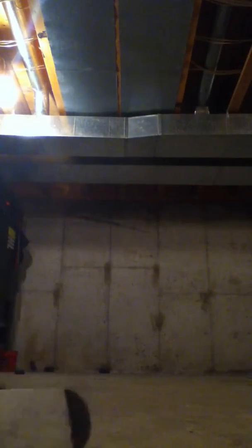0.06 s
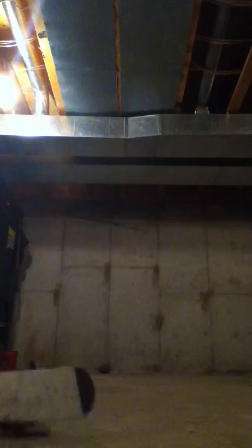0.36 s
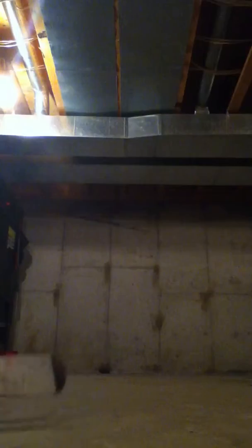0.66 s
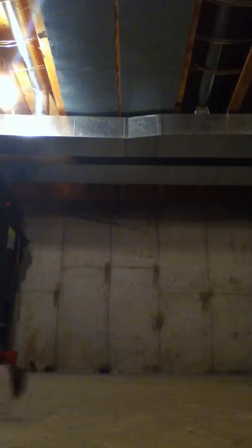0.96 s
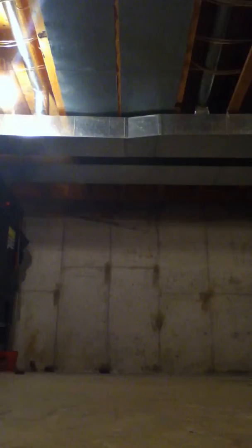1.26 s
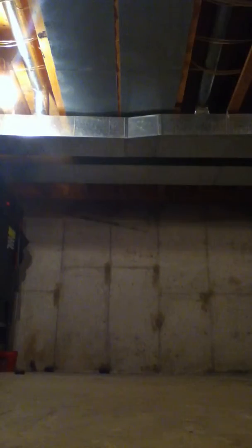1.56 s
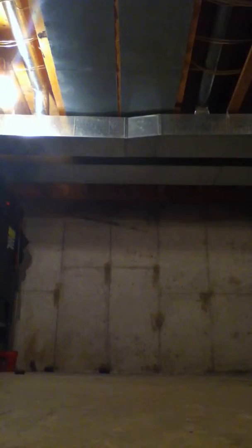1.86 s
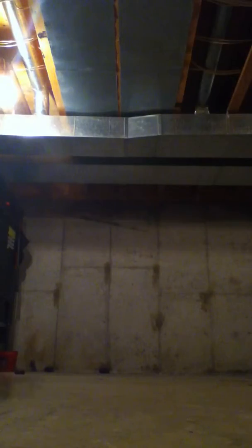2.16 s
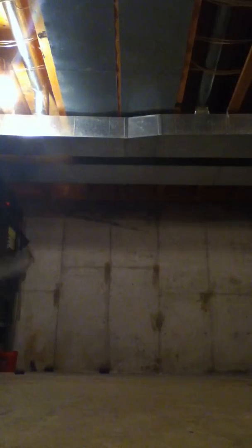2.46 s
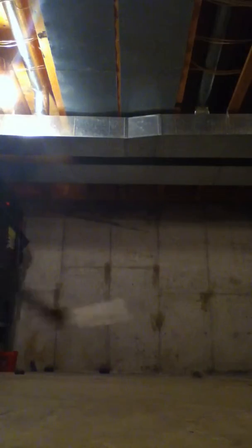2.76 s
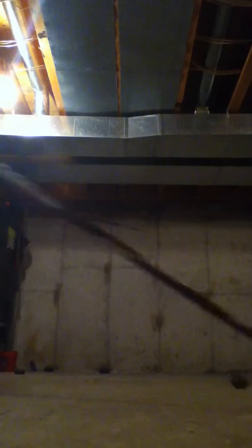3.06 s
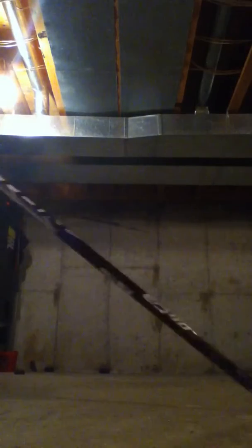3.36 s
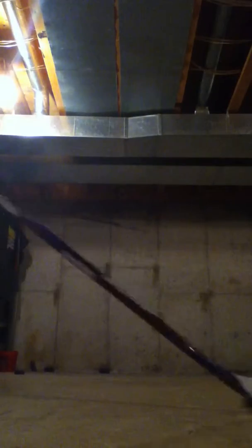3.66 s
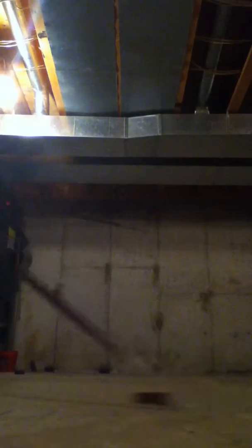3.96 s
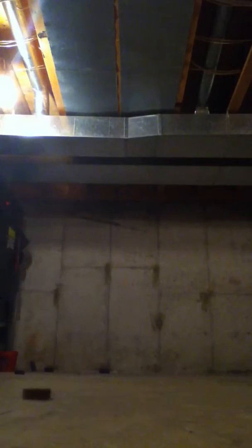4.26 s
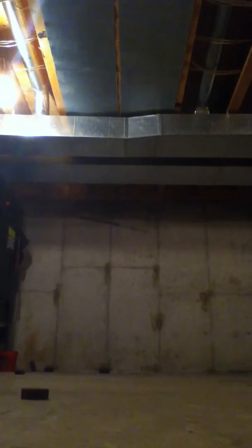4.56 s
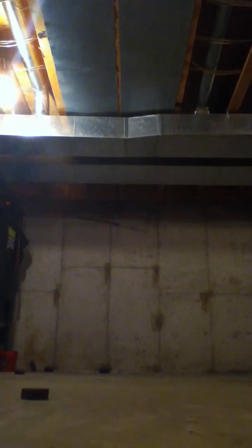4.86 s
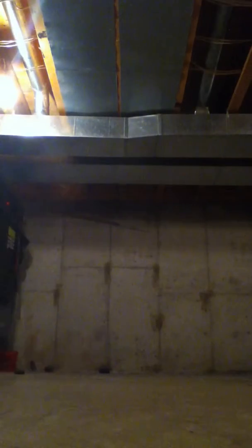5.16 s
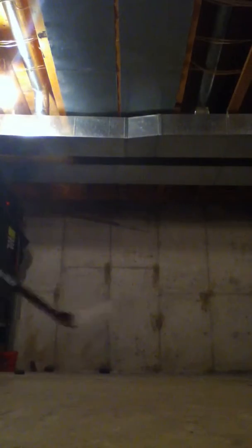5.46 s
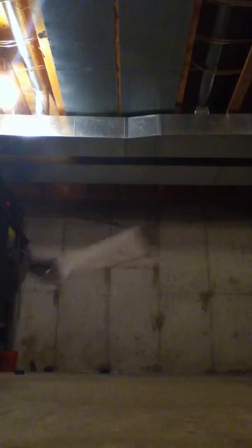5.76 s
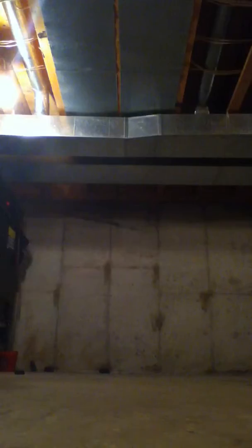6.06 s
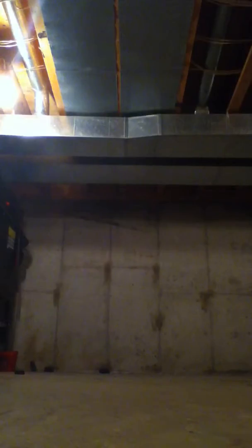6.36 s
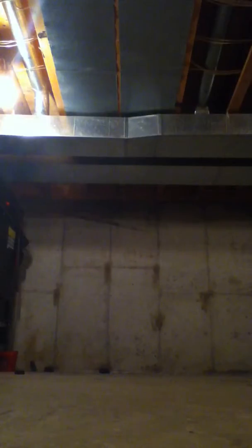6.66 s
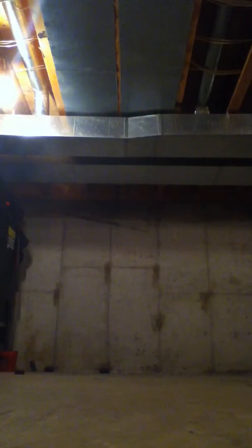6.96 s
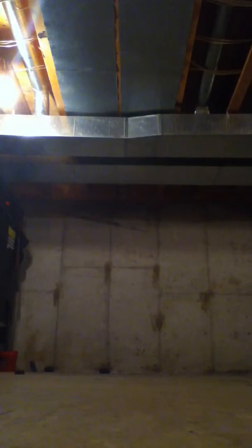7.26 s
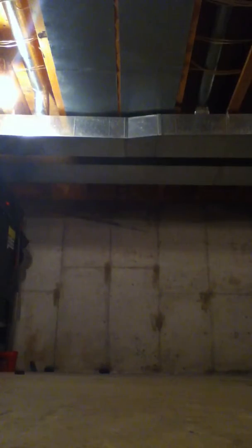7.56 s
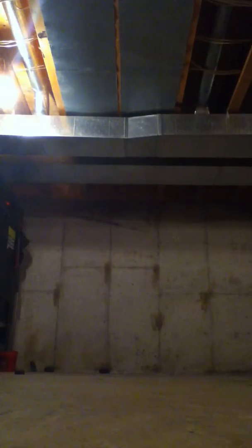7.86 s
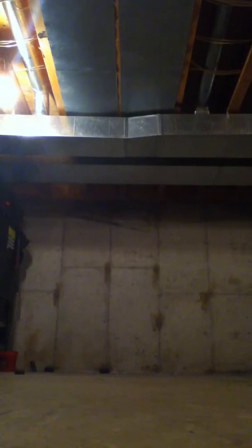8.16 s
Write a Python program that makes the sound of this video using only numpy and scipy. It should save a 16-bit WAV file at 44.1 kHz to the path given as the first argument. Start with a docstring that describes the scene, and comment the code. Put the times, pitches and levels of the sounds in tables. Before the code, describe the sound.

Two sharp cracks of a hockey puck hitting a basement wall, amid woody taps, dull footsteps and a stick slapping concrete.

```python
"""A hockey puck is tapped about a concrete basement and shot twice at the wall, where it drops and bounces.
The stick's blade clacks, chatters and scrapes on the floor, feet thud and clothes swish.
Each blow is a short burst of force that rings the struck body, then the bare room. A small microphone
on the floor is buffeted by the swings and overloads on the hardest hits. A faint whine comes and
goes over quiet rumble, hiss and hum."""
import sys
import numpy as np
from scipy import signal
from scipy.fft import rfft, irfft
from scipy.io import wavfile

SR = 44100
rng = np.random.default_rng(int(sys.argv[2]) if len(sys.argv) > 2 else 0)


def wav_record(signal):
    """Record a signal, one row per channel, as 16-bit PCM in the file named by sys.argv[1]."""
    frames = np.transpose(np.atleast_2d(signal))
    bounded = np.clip(frames, -1, 1)
    # unit amplitude maps onto the largest positive 16-bit level
    quanta = np.round(bounded * 32767).astype(np.int16)
    wavfile.write(sys.argv[1], SR, quanta)


N = 362497
RING = 32768  # samples for a blow to ring out
TIME, AGE = np.arange(N) / SR, np.arange(RING) / SR  # seconds into the scene, seconds into a blow


# Puck meets blade. Each row: start in seconds, then level, bass, treble and room send in dB.
TAP_HITS = [(.0966, -20, -5, 2.5, -7), (.9362, -12, 4.5, -9.5, -7.5), (3.364, -33, 27, 5, 1.5),
            (3.4185, -17.5, 14, -12.5, -2.5), (3.422, -20.5, -8, -18, -8), (4.278, -38, 10, 8, 4),
            (5.799, -30, 20, -34, -7.5), (7.8838, -16.5, 2.5, 6, 9.5), (7.891, -15, -20, 2.5, -1.5),
            (7.8945, -22, 9.5, -6, 3.5)]
# The woody tone of the blade. Each row: frequency in Hz, gain in dB.
WOOD_EQ = [(40, -34), (100, -26), (200, -19), (550, -12.5), (900, -4), (1250, -0.5), (2200, -2.5),
           (3500, -6), (5500, -12), (8000, -25.5), (11000, -48), (16000, -61.5)]
# Its resonances. Each row: frequency in Hz, width in Hz, boost in dB.
WOOD_PEAKS = [(674, 59, 7.5), (1060, 70, 5), (1242, 54, 7), (1374, 133, 7), (2055, 102, 9.5), (2330, 70, 8),
              (2790, 25, 4.5), (2950, 28, 7.5), (3590, 66, 7.5)]

def puck_taps():
    """Puck and blade knock together with a clean, woody tock."""
    return blows(TAP_HITS, WOOD_EQ, WOOD_PEAKS, chatter=0.35, chatter_s=0.0015, touch_db=-14)


# Two shots, each a cluster of hits. Each row: start in seconds, then level, bass, treble, room send in dB.
SHOT_HITS = [(2.264, -8.5, 7.5, -6, -15.5), (2.266, -3.5, -6.5, 4.5, -17), (2.276, -16, -6.5, -1, 9),
             (2.29, -27.5, -3.5, -6.5, 15), (2.3045, -12, 7, -0.5, 5), (2.331, -22.5, -5, -15, 10.5),
             (5.1915, -9.5, 25, -11, -6.5), (5.194, -11.5, -23, -2, 4), (5.2015, -5.5, 4.5, -6, -1.5),
             (5.207, -23.5, 1, -4, 11)]
# The hard tone of the slam. Each row: frequency in Hz, gain in dB.
WALL_EQ = [(40, -28.5), (280, -18.5), (450, -4.5), (700, -5), (1800, 2), (3000, -2), (5200, -1),
           (8000, -10.5), (11000, -16.5), (16000, -57.5)]
# Its resonances. Each row: frequency in Hz, width in Hz, boost in dB.
WALL_PEAKS = [(580, 110, 4.4), (728, 120, 5.5), (857, 30, 3.3), (1020, 150, 2.8), (1400, 56, 1.7),
              (1880, 59, 2)]

def wall_shots():
    """The blade whips the puck away and it slams into the wall with a tight crack."""
    return blows(SHOT_HITS, WALL_EQ, WALL_PEAKS, chatter=1.4, chatter_s=0.00053, touch_db=-31)


# Puck meets floor. Each row: start in seconds, then level, bass, treble and room send in dB.
BOUNCE_HITS = [(.0252, -21, 0.5, 5, -14), (.072, -27.5, 4, -4, -5.5), (.3255, -28, 4, -5.5, -22),
               (.395, -37, 29, -18, -5), (.495, -37.5, 14.5, 19, -2.5), (.5965, -30.5, 5, 13.5, -0.5),
               (.5984, -27.5, 7, 25, -25), (.671, -29.5, 7, 13.5, -5), (.697, -36.5, -2.5, -2, -1.5),
               (1.146, -40.5, 7, 6, -3), (1.184, -49, 8, 6, -1), (2.5342, -18, -1.5, 22, -3),
               (2.5388, -17.5, -9, -23, -2), (2.574, -24, -10, -14, -4), (2.7005, -32.5, 3.5, 14, 3),
               (2.957, -32.5, 0.5, -6, -6.5), (3.248, -37.5, 4.5, 4, 3.5), (3.265, -36, 3, 7, -8),
               (4.292, -37.5, 11, 15, 1), (4.837, -42, 13.5, 5, -1), (5.449, -19.5, -6.5, -19, 2.5),
               (5.4535, -30, 9, 24, 4), (5.644, -36, 3, -18, 14.5), (8.0095, -25.5, -1, 0.5, 4)]
# The dark tone of the puck. Each row: frequency in Hz, gain in dB.
PUCK_EQ = [(40, -16), (200, -4.5), (450, 0), (850, -3), (1400, -6.5), (2200, -10), (3500, -18.5),
           (6500, -26.5), (10000, -34), (16000, -59.5)]
# Its weak resonances. Each row: frequency in Hz, width in Hz, boost in dB.
PUCK_PEAKS = [(570, 180, 2.5), (900, 34, 1.5), (1110, 36, 1)]

def puck_bounces():
    """The puck drops and bounces on the concrete, barely ringing."""
    return blows(BOUNCE_HITS, PUCK_EQ, PUCK_PEAKS, chatter=0.78, chatter_s=0.0022, touch_db=-16)


# Blade meets floor. Each row: start in seconds, then level, bass, treble and room send in dB.
CLACK_HITS = [(.001, -31, 0, 6.5, 9.5), (1.353, -58, 2, 40, -3), (4.714, -55, 1.5, 16, -14),
              (4.745, -61, 0, 18, -6), (4.85, -48, -3, 1, 0), (6.514, -25.5, 1, -15, 9),
              (6.5312, -16, 18, 29, 2.5), (6.54, -18.5, 5, 1, 9), (6.5842, -8.5, -2, 0, -2.5),
              (6.5905, -13.5, -5.5, -4, -2), (7.084, -46, 3, 27, -7), (7.101, -50.5, -1.5, 10.5, 4.5),
              (7.3008, -13, 5, 6, -1), (7.308, -19, 10, 32, 2.5), (7.5808, -27.5, 13.5, 20, 1),
              (7.8808, -33, 4, -2, -11), (7.8838, -17, 9.5, 8, -3)]
# The mid-forward tone of the slap. Each row: frequency in Hz, gain in dB.
BLADE_EQ = [(40, -26), (110, -13.5), (250, 1), (700, 4.5), (1600, 5.5), (3000, 3.5), (5000, -6),
            (8000, -15), (11000, -22.5), (16000, -58)]
# Its narrow resonances. Each row: frequency in Hz, width in Hz, boost in dB.
BLADE_PEAKS = [(700, 22, 6.8), (992, 30, 4.6), (1134, 38, 3.8), (1275, 31, 6.4), (1525, 22, 3.3),
               (1706, 30, 10.1), (2079, 26, 8.5), (2387, 35, 5.3), (3000, 25, 3.8), (3289, 30, 5),
               (3700, 72, 7.3), (4350, 30, 6), (4950, 60, 6)]

def blade_clacks():
    """The blade slaps the concrete: a rough attack and a ringing clack."""
    return blows(CLACK_HITS, BLADE_EQ, BLADE_PEAKS, chatter=4.6, chatter_s=0.0019, touch_db=-10.5)


# A quick run of edge hits. Each row: start in seconds, then level, bass, treble and room send in dB.
EDGE_HITS = [(7.5245, -22.5, -4, -8, -4), (7.5355, -25, 1, -5, -6), (7.5808, -19, 0, 10, -2.5),
             (7.5875, -23.5, -3, 0, -9), (7.591, -20.5, -4, -2, -13.5), (7.5978, -24, -1, 2, -12.5)]
# The thin tone of the edge. Each row: frequency in Hz, gain in dB.
EDGE_EQ = [(40, -35), (500, -19), (1800, -7), (3200, -0.5), (4400, -6), (7500, -11), (11000, -26.5),
           (16000, -54)]
# Its bright resonances. Each row: frequency in Hz, width in Hz, boost in dB.
EDGE_PEAKS = [(3030, 68, 7), (3390, 90, 7), (4870, 60, 13), (6340, 120, 4)]

def edge_chatter():
    """The blade's hard edge skips over the floor in bright ticks."""
    return blows(EDGE_HITS, EDGE_EQ, EDGE_PEAKS, chatter=0.7, chatter_s=0.001, touch_db=-11)


# Drags and skids. Each row: start and length in seconds, then level, bass and treble in dB.
DRAGS = [(0.278, 0.035, -48.5, 10, -1), (0.295, 0.024, -40, 10, -48), (3.559, 0.16, -48, 4, -1),
         (3.748, 0.03, -34, 4, -4.5), (3.778, 0.16, -34.5, 1.5, 0), (3.8, 0.1, -35, -5, -4),
         (7.514, 0.03, -21.5, -11.5, -1)]
# The gritty tone of the floor. Each row: frequency in Hz, gain in dB.
GRIT_EQ = [(40, -31), (300, -4), (900, -4), (1900, -2), (3200, -1), (5000, -6.5), (8000, -9.5),
           (11000, -20.5), (16000, -44)]
# Resonances of the dragged blade. Each row: frequency in Hz, width in Hz, boost in dB.
DRAG_PEAKS = [(717, 20, -0.5), (1145, 50, 6.5), (1800, 71, 8), (2105, 50, 6), (2480, 55, 6.5),
              (3020, 36, 6.5), (3600, 90, 1), (4950, 83, 6)]

def blade_scrapes(grain_db=6.5, catch_db=5, catch_hz=110, room_db=-2):
    """Grit catches and releases the blade: dense, uneven clicks in short spurts."""
    out = np.zeros(N)
    for start, length, db, bass_db, treble_db in DRAGS:
        size = int(length * SR)
        grip = np.interp(AGE * catch_hz, np.arange(RING), rng.standard_normal(RING))
        clicks = rng.standard_normal(RING) * undb(grain_db * rng.standard_normal(RING) + catch_db * grip)
        force = unit(clicks[:size]) * signal.windows.tukey(size, alpha=0.3)
        ring = body(GRIT_EQ, DRAG_PEAKS, bass_db, treble_db)
        add(out, start, undb(db) * signal.fftconvolve(force, ring))
    return out + undb(room_db) * signal.fftconvolve(out, basement())[:N]


# Footfalls and puck thumps. Each row: start in seconds, then level, bass, treble and room send in dB.
THUD_HITS = [(.966, -31.5, -19, -23, -10), (2.808, -41.5, -15.5, -7, 5.5), (2.88, -36, -13, 2, 1),
             (3.057, -38.5, -10, 6, 8), (3.154, -49, -9, 10, 14), (3.708, -39.5, -20, 2, 7),
             (4.135, -46.5, -2, 3, 6), (4.19, -56, -4, 0, 12), (5.642, -21.5, 3.5, 19.5, -9),
             (6.061, -27.5, -1, -3.5, -1.5), (6.2755, -26.5, -10, -5, 0), (6.466, -29.5, -4, 0.5, 1.5)]
# Their muffled tone. Each row: frequency in Hz, gain in dB.
THUD_EQ = [(40, -24), (100, -17.5), (190, 1.5), (380, -0.5), (700, -7), (1300, -24), (4000, -29),
           (16000, -50)]
# Their low resonances. Each row: frequency in Hz, width in Hz, boost in dB.
THUD_PEAKS = [(188, 81, 9.5), (357, 49, 7)]

def thuds():
    """Feet and puck land dully, the force smeared over a long contact."""
    return blows(THUD_HITS, THUD_EQ, THUD_PEAKS, chatter=2.1, chatter_s=0.015, touch_db=-19)


# The stick passes the microphone. Each row: fastest moment in seconds, level in dB.
STICK_PASSES = [(2.285, -28), (5.194, -36)]
# Pops of air. Each row: start in seconds, signed strength, decay in seconds.
AIR_POPS = [(2.2659, -0.74, 0.0011), (2.2833, 0.6, 0.0023)]

def swing_wind(rise_db_per_s=193, fall_db_per_s=396, pop_rise_s=0.0001):
    """The swings buffet the microphone: a low flutter and two abrupt shoves of air."""
    wind_eq = [(10, -12.5), (30, -5), (80, -17.5), (200, -14.5), (1000, -55), (5000, -100)]
    flutter = colour(rng.standard_normal(N), wind_eq)
    out = np.zeros(N)
    for peak_s, db in STICK_PASSES:
        fade_db = np.maximum(rise_db_per_s * (peak_s - TIME), fall_db_per_s * (TIME - peak_s))
        out += undb(db - fade_db) * flutter
    for start, strength, decay in AIR_POPS:
        add(out, start, strength * (1 - np.exp(-AGE / pop_rise_s)) * np.exp(-AGE / decay))
    return out


# Strides and arm strokes. Each row: start in seconds, length in seconds, relative level in dB.
STROKES = [(0.7, 0.35, -48), (1.533, 0.26, -59.5), (1.947, 0.16, -63), (2.113, 0.12, -40.5),
           (2.791, 0.089, -44.5), (3.0, 0.45, -57.5), (3.413, 0.23, -59.5), (3.93, 0.12, -52),
           (4.074, 0.23, -49.5), (4.434, .22, -50), (4.837, 0.14, -54.5), (5.001, .11, -42.5),
           (5.086, 0.25, -47), (5.656, 0.059, -49), (5.725, 0.11, -51), (5.854, 0.16, -41.5),
           (5.99, 0.28, -48.5), (6.368, 0.2, -54), (7.11, 0.16, -60), (8.04, .13, -45),
           (8.133, 0.14, -42.5)]

def clothes_swishes(gain_db=2, grain_db=3, rustle_db=-64.5, room_db=-6):
    """Fabric and soles rub with a fine hiss that follows the speed of each stroke."""
    rubbing = undb(rustle_db) * ((TIME > 2.1) & (TIME < 6.5))  # a rustle bed as the player moves about
    for start, length, db in STROKES:
        progress = np.linspace(0, 1, int(length * SR))
        arc = np.interp(progress, [0, 0.39, 1], [0, 0.5, 1])  # fastest 39% of the way through
        speed = np.sin(np.pi * arc).clip(0)
        add(rubbing, start, undb(db) * speed ** 0.85)
    fibres = rng.standard_normal(N) * undb(grain_db * rng.standard_normal(N))
    hiss = undb(gain_db) * rubbing * cloth(fibres)
    return hiss + undb(room_db) * signal.fftconvolve(hiss, basement())[:N]


# The airy tone of fabric. Each row: frequency in Hz, gain in dB.
CLOTH_EQ = [(100, -1.5), (400, -8.5), (1000, -8), (2000, 0), (3200, 0.5), (6500, -0.5), (9500, -5.5),
            (13000, -14), (16000, -26)]

def cloth(fibres):
    """Fabric gives the rubbing fibres a soft low end and a breathy top."""
    return colour(fibres, CLOTH_EQ)


# The basement's reverb. Each row: frequency in Hz, seconds to fall by 60 dB.
REVERB_TIMES = [(100, 0.54), (260, 0.59), (700, 0.61), (1800, 0.52), (4800, 0.5), (9000, 0.42),
                (14000, 0.48)]

def basement(build_s=0.0041, early_s=0.022, early_db=4):
    """Unit-energy echoes from one spot: separate reflections thicken to a wash whose treble dies first."""
    noise = rng.standard_normal(RING)
    spikes_db = early_db * np.exp(-AGE / early_s) * (rng.standard_normal(RING) + 1)
    spectrum = rfft(noise * undb(spikes_db))
    centres = np.transpose(REVERB_TIMES)[0]
    tail = 0
    for share, (_, t60) in zip(np.eye(len(centres)), REVERB_TIMES):
        band = irfft(spectrum * np.interp(np.log(freqs(RING)), np.log(centres), share))
        tail = tail + band * undb(-60 * AGE / t60)
    return unit_energy(tail * (1 - np.exp(-AGE / build_s)))


# Swells of the whine. Each row: start in seconds, length in seconds, level in dB.
WHINE_SWELLS = [(1.53, 0.35, -67), (4.66, .22, -69.5)]

def whine(pitch_hz=1160, width_hz=25):
    """A narrow band of noise swells and fades as a thin, wavering tone."""
    swell = np.zeros(N)
    for start, length, db in WHINE_SWELLS:
        add(swell, start, undb(db) * np.hanning(int(length * SR)))
    band = 1 / (1 + (2 * (freqs(N) - pitch_hz) / width_hz) ** 2)
    return swell * unit(irfft(rfft(rng.standard_normal(N)) * band, N))


def room_tone(air_db=-59, hum_hz=294, hum_db=-69.5):
    """A quiet bed of rumble and hiss with a faint hum."""
    air_eq = [(25, -6), (90, -6), (150, -13.5), (300, -15.5), (550, -22), (1100, -25),
              (3000, -31.5), (8000, -34.5), (15000, -42.5)]
    air = undb(air_db) * colour(rng.standard_normal(N), air_eq)
    hum = undb(hum_db) * np.sqrt(2) * np.sin(2 * np.pi * hum_hz * TIME)
    return air + hum


def blows(hits, eq, peaks, chatter, chatter_s, touch_db, touch_s=0.002):
    """Each blow is a light touch, a sharp push and dying chatter; it rings the body, then the room."""
    out = np.zeros(N)
    lead = int(touch_s * SR)
    for start, db, bass_db, treble_db, room_db in hits:
        ring = body(eq, peaks, bass_db, treble_db)
        force = chatter * unit_energy(rng.standard_normal(RING) * np.exp(-AGE / chatter_s))
        force[0] += 1  # the push
        direct = unit_energy(signal.fftconvolve(force, ring)[:RING])
        echo = signal.fftconvolve(ring, basement())[:RING]
        touch = rng.standard_normal(RING)[:lead] * np.linspace(0, 1, lead) / np.sqrt(lead)
        add(out, start - touch_s, undb(db + touch_db) * signal.fftconvolve(touch, ring))
        add(out, start, undb(db) * (direct + undb(room_db) * echo))
    return out * np.sqrt(0.005 * SR)  # level is the rms of the direct energy packed into 5 ms


def body(eq, peaks, bass_db, treble_db):
    """Unit-energy ring of a struck body; a heavier contact adds bass, a harder one treble."""
    f = freqs(RING)
    shelves = [(60, 0), (150, bass_db), (330, bass_db), (1300, 0.0039), (6000, treble_db)]
    gain = undb(along(eq, f) + along(shelves, f))
    for hz, width, db in peaks:
        detuning = (f / hz - hz / f) * hz / width
        gain *= np.abs(1 + (undb(db) - 1) / (1 + 1j * detuning))
    # minimum phase: the sound starts at the blow and each resonance rings on after it
    cepstrum = irfft(np.log(gain))
    cepstrum[1:RING // 2] *= 2
    cepstrum[RING // 2 + 1:] = 0
    return unit_energy(irfft(np.exp(rfft(cepstrum))))


def colour(x, eq):
    """Shape a sound with an EQ curve of (Hz, dB) points, at an rms of one."""
    gain = undb(along(eq, freqs(len(x))))
    return unit(irfft(rfft(x) * gain, len(x)))


def along(points, f):
    """Read (Hz, value) points on a log-frequency axis."""
    hz, value = np.transpose(points)
    return np.interp(np.log(f), np.log(hz), value)


def freqs(size):
    """Frequencies of a real transform, floored at 1 Hz."""
    return np.maximum(np.arange(size // 2 + 1) * SR / size, 1)


def undb(db):
    """Decibels to gain."""
    return 10 ** (np.asarray(db) / 20)


def unit(x):
    """Scale to an rms of one."""
    return x / np.sqrt(np.mean(x ** 2))


def unit_energy(x):
    """Scale to a total energy of one."""
    return x / np.sqrt(np.sum(x ** 2))


def add(out, start, x):
    """Mix a sound in at a start time in seconds."""
    i = max(int(start * SR), 0)
    out[i:i + len(x)] += x[:N - i]


def scene():
    """Puck, stick and player over the basement's room tone, in mono."""
    impacts = puck_taps() + puck_bounces() + blade_clacks() + wall_shots() + thuds() + edge_chatter()
    movement = blade_scrapes() + clothes_swishes() + swing_wind()
    return (impacts + movement + whine() + room_tone())[None]


def record(dry, ceiling=0.61, top_hz=16000):
    """The microphone flattens the hardest peaks and loses the very top."""
    rounded = dry / (1 + (dry / ceiling) ** 4) ** (1 / 4)
    lowpass = signal.ellip(8, 0.2, 70, top_hz, fs=SR, output="sos")
    return signal.sosfilt(lowpass, rounded, axis=-1)


dry = scene()
out = record(dry)
wav_record(out)
```